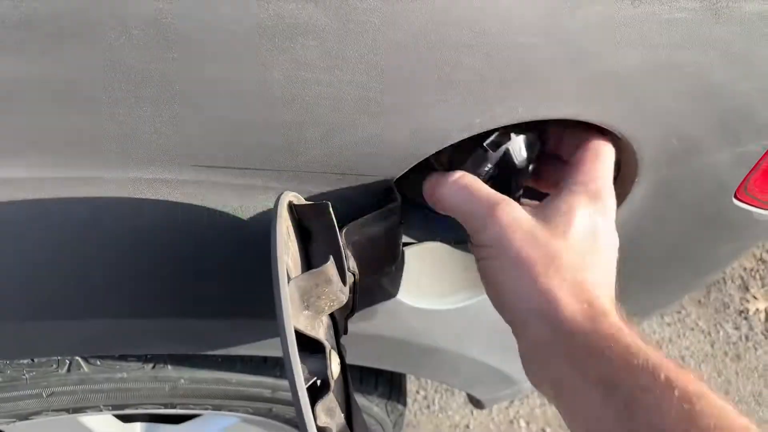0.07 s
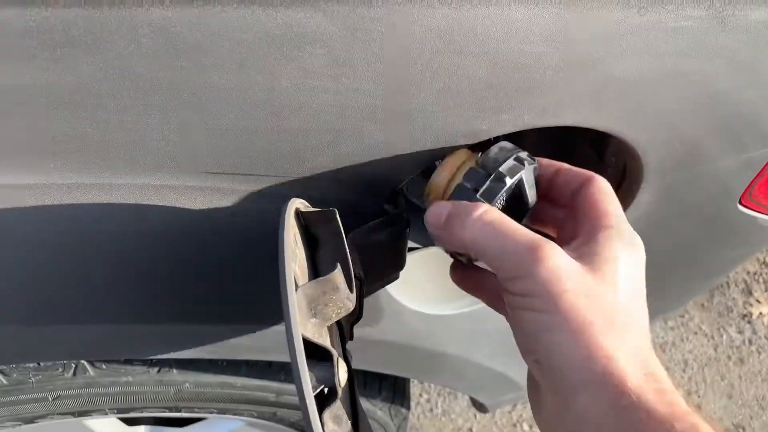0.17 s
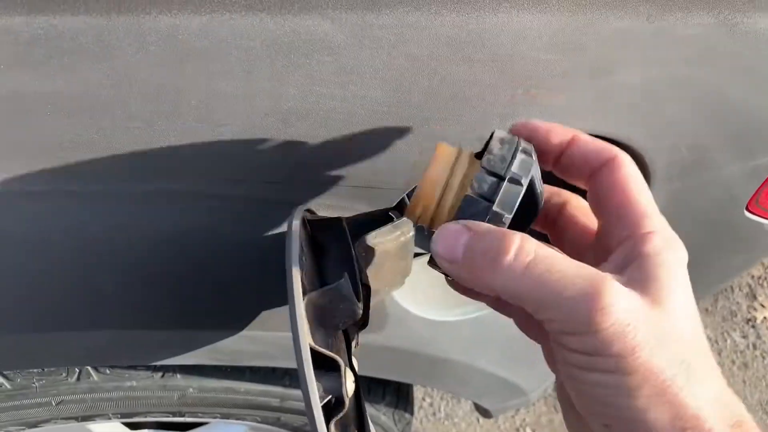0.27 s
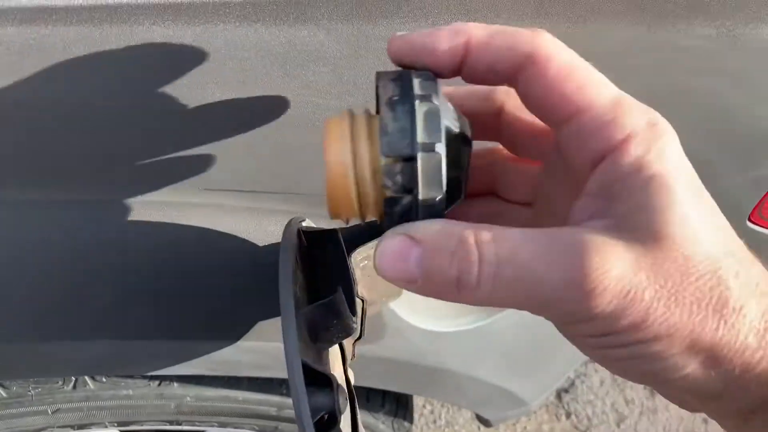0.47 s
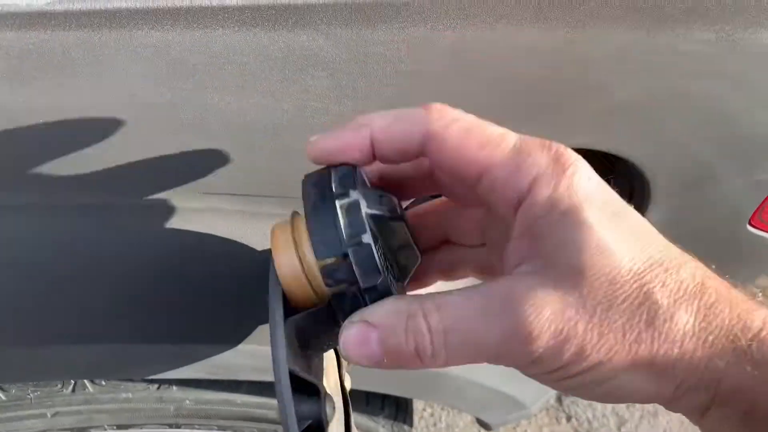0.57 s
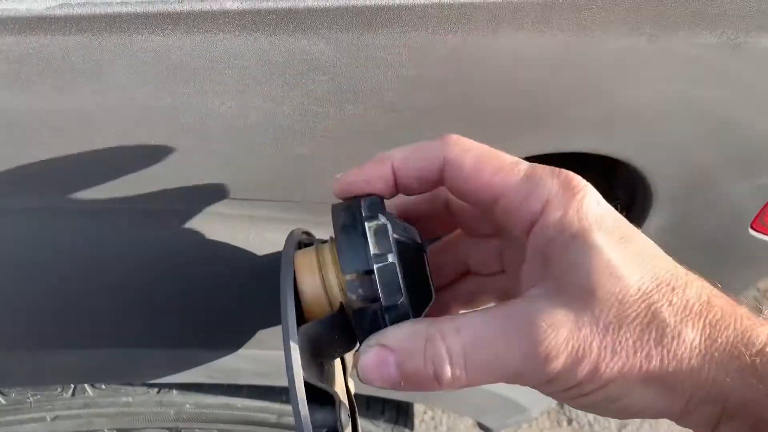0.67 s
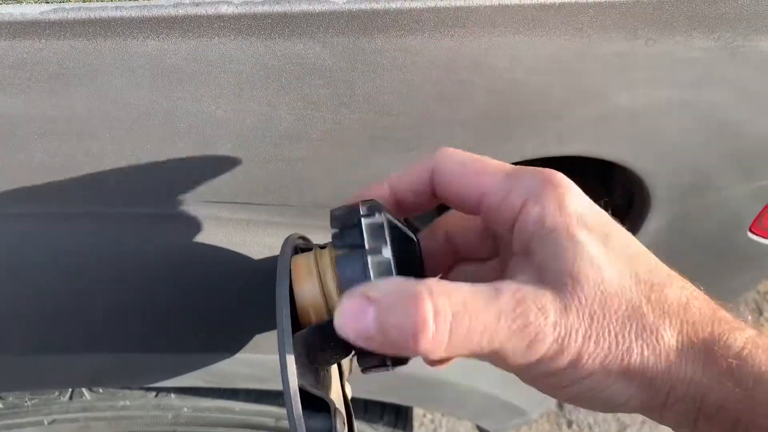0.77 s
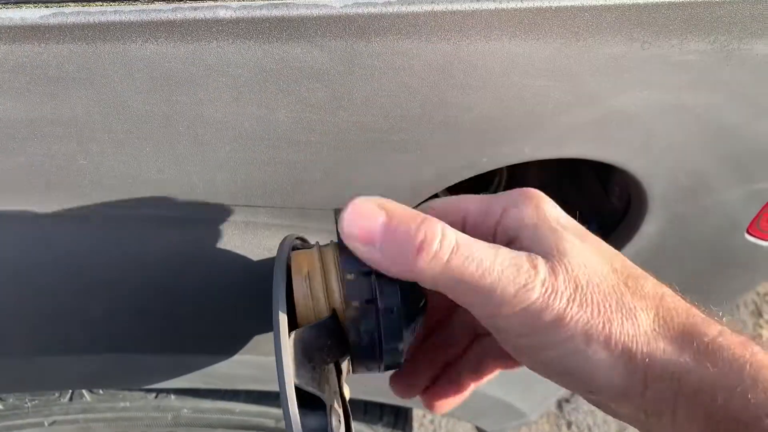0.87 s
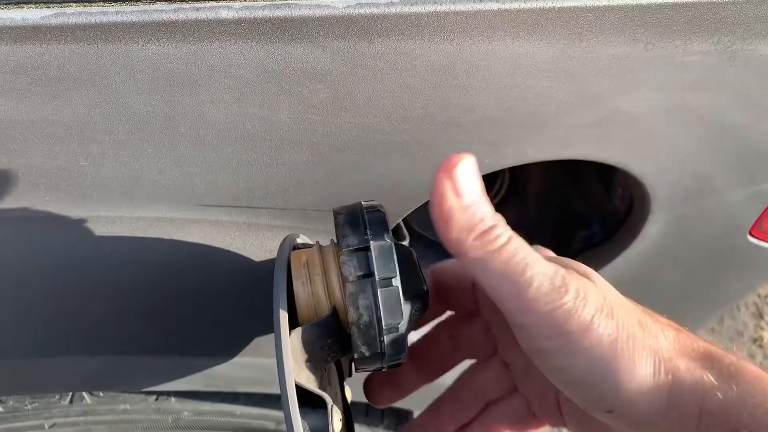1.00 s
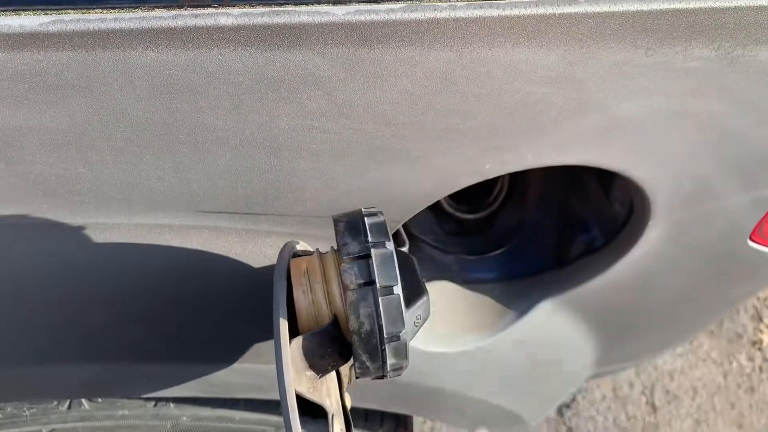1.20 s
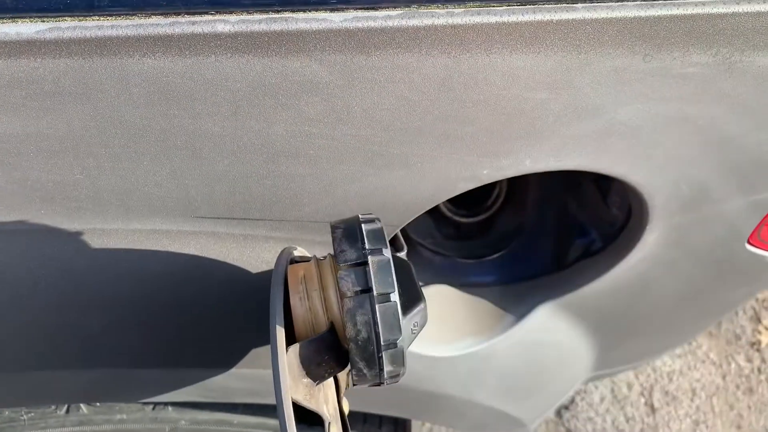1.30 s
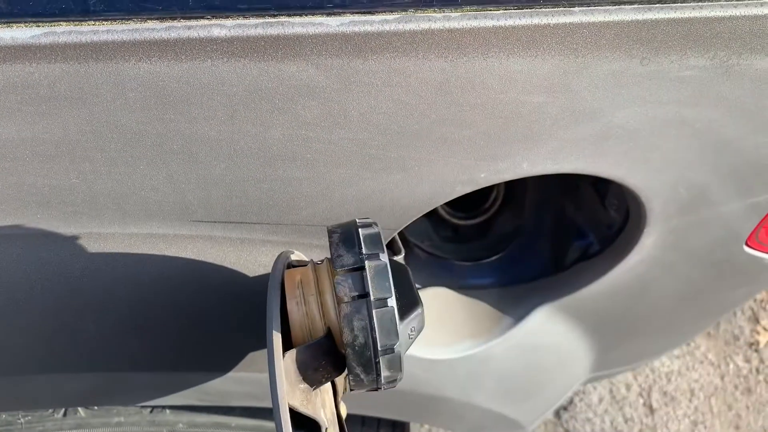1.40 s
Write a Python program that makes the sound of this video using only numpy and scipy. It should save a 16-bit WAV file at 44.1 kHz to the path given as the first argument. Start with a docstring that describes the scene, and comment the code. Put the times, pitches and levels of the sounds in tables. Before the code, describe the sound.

A plastic fuel cap comes out of the filler neck with a hollow clunk at about 0.1 seconds, followed by tiny ticks. At 0.5 seconds it knocks onto the fuel door and rocks briefly. Around 0.75 seconds it rubs and bumps into place, with light finger scuffs and soft booms from the car panel until about 1 second. Distant traffic rumbles and hisses faintly throughout.

```python
"""A plastic fuel cap comes out of the filler neck with a hollow clunk, then is knocked onto the open fuel door
and settles. Each clunk is a quick run of contacts: a crack and ringing plastic, whose low notes spread more
slowly through the struck part and thump a moment later. Fingers scuff the cap, which ticks and drags as it is
handled. Distant traffic rumbles and hisses off to the right the whole time."""
import sys
import numpy as np
from scipy import signal
from scipy.fft import rfft, irfft
from scipy.io import wavfile

SR = 44100
rng = np.random.default_rng(int(sys.argv[2]) if len(sys.argv) > 2 else 0)


def dump_mix(stems):
    """Bounce the given channels to the path in sys.argv[1] as a 16-bit WAV at rate SR."""
    frames = np.atleast_2d(stems).T  # one column per channel
    limited = np.clip(frames, -1, 1)  # hard clip at full scale
    pcm = np.round(limited * 32767).astype(np.int16)
    wavfile.write(sys.argv[1], SR, pcm)


N = 63945
T = np.arange(N) / SR
FREQS = np.maximum(np.arange(N // 2 + 1) * SR / N, 1)
LEFT_RIGHT = np.array([[1], [-1]])


def from_db(db):
    """Turn decibels into a number to multiply by."""
    return 10 ** (np.asarray(db) / 20)


def unit_power(x):
    """Scale a sound to an average power of 1."""
    return x / np.sqrt(np.mean(x ** 2) + 1e-20)


def at_hz(rows, hz, column=1):
    """Look up a pitch in a table, sliding between its rows."""
    table = np.array(rows)
    return np.interp(np.log(hz), np.log(table[:, 0]), table[:, column])


def sides(pan_db):
    """Gains that make the left side pan_db louder than the right."""
    return from_db(LEFT_RIGHT * pan_db / 2)


# Where the cap is heard. Each row: pitch in Hz, left minus right level in dB.
CAP_PAN = [(150, -0.5), (450, 1.7), (900, 7.5), (2000, 5), (4000, -1.5), (12000, -0.5)]
# Each row: pitch in Hz, how alike the two sides are (1 is fully alike).
CAP_LIKENESS = [(150, .97), (400, .9), (1000, .6), (2000, .4), (5000, .55), (12000, .8)]
# Each row: pitch in Hz, delay of the left side in milliseconds.
CAP_LAG = [(900, 0), (1600, 0.294)]
def noise(colour, likeness=CAP_LIKENESS, lag=CAP_LAG, pan=CAP_PAN, tilt_db=0):
    """Stereo noise with a given tone colour, placed at the cap unless told otherwise."""
    mid, side = rfft(rng.standard_normal((2, N)))
    alike = at_hz(likeness, FREQS)
    both = np.sqrt(1 + alike) * mid + np.sqrt(1 - alike) * side * LEFT_RIGHT
    both *= sides(at_hz(pan, FREQS))
    both[0] *= np.exp(-2j * np.pi * FREQS * at_hz(lag, FREQS) / 1000)
    tone = from_db(at_hz(colour, FREQS) + tilt_db * np.log2(FREQS))
    return unit_power(irfft(both * tone, N))


# The street's tone. Each row: pitch in Hz, relative level in dB.
TRAFFIC_COLOUR = [(25, -28), (40, -22), (55, -1.5), (75, 0.0), (105, 1), (150, -1), (200, -2.5), (300, -11),
                  (400, -13), (600, -15.5), (900, -14), (1400, -12.5), (1700, -9), (2100, -11),
                  (2550, -20.5), (3050, -30.5), (4400, -26.5), (5600, -41.5), (8000, -44), (10000, -55.5),
                  (15000, -88)]
# Each row: time in seconds, level in dB.
TRAFFIC_LEVEL = [(0, -39.5), (0.35, -37), (0.8, -35), (1.44, -36.5)]
# Each row: pitch in Hz, how alike the two sides are.
TRAFFIC_LIKENESS = [(100, 1), (300, 0.88), (800, 0.65), (2000, .75), (5000, 0.2), (12000, 0.13)]
# Each row: pitch in Hz, delay of the left side in milliseconds.
TRAFFIC_LAG = [(200, 0.72), (1500, 0.41)]
# Each row: pitch in Hz, left minus right level in dB.
TRAFFIC_PAN = [(100, .4), (700, 0.5), (2000, 2.5), (5000, -2), (12000, -4.5)]
# Engine notes. Each row: pitch in Hz, level in dB at 1 second, change in dB per second.
ENGINE_NOTES = [(81.5, -48, -4), (174.6, -47, 5.5), (317.9, -49.5, 8), (398.8, -63, -6)]
def traffic(note_width_hz=3.8):
    """Far rumble and tyre hiss; narrow bands of noise make a wavering engine drone."""
    level = from_db(np.interp(T, *np.transpose(TRAFFIC_LEVEL)))
    street = level * noise(TRAFFIC_COLOUR, TRAFFIC_LIKENESS, TRAFFIC_LAG, TRAFFIC_PAN)
    white = rfft(rng.standard_normal(N))
    for hz, db, growth in ENGINE_NOTES:
        note = irfft(white / (1 + ((FREQS - hz) / note_width_hz) ** 2), N)
        street += from_db(db + growth * (T - 1)) * unit_power(note)
    return street


def swells(rows):
    """Pressure that rises and falls smoothly, once for each row."""
    return sum(from_db(db) * np.exp(-.5 * ((T - middle) / half) ** 2) for middle, half, db in rows)


# Finger slides. Each row: middle in seconds, half length in seconds, level in dB.
SCUFFS = [(0.02, 0.0083, -46), (0.562, 0.0095, -41), (0.6, 0.082, -65.5), (0.755, 0.056, -55.5),
          (0.85, 0.033, -63), (0.945, 0.011, -59.5), (1.298, 0.012, -56.5), (1.395, 0.03, -57.5)]
# Each row: pitch in Hz, relative level in dB.
SCUFF_COLOUR = [(1000, 5.5), (3000, 0.5), (5000, 0.5), (7500, 2.5), (10300, 2), (13500, -6.5), (15500, -1)]
def finger_scuffs():
    """Fingers slide over the cap with a faint hiss."""
    return swells(SCUFFS) * noise(SCUFF_COLOUR)


def blow(start, rise, fade):
    """Loudness of one contact: it rises fast, then drops 60 dB in `fade` seconds."""
    age = np.maximum(T - start, 0)
    return (1 - np.exp(-age / rise)) * from_db(-60 * np.minimum(age / fade, 4))


def travel(hz, delay_s=0.00202, instant_hz=6075, longest_s=0.00671):
    """Seconds a bending wave takes to spread over the part: low notes arrive later."""
    return np.clip(delay_s * (np.sqrt(instant_hz / hz) - 1), 0, longest_s)


THUMP_HZ, RING_LOW_HZ, RING_HIGH_HZ, CRACK_HZ = 420, 736, 2380, 3520
def strength(hz, thump, ring, crack):
    """How hard a contact drives a pitch: thump sets the lows, ring the middle, crack the highs."""
    levels = [(THUMP_HZ, thump), (RING_LOW_HZ, ring), (RING_HIGH_HZ, ring), (CRACK_HZ, crack)]
    return from_db(at_hz(levels, hz))


SKEW_RAD, SKEW_FULL_HZ = 1.67, 1300   # the two sides swing out of step, most from this pitch up
def ringing(hits, notes, rise_cycles=0.68):
    """Every contact sets the part's own notes swinging; low ones build up more slowly."""
    out = np.zeros((2, N))
    for k, (hz, db, fade) in enumerate(notes):
        sign = (-1) ** k
        skew = sign * SKEW_RAD * min(hz / SKEW_FULL_HZ, 1) * LEFT_RIGHT / 2
        gain = sign * from_db(db) * sides(at_hz(CAP_PAN, hz))
        for start, *levels in hits:
            arrival = start + travel(hz)
            swing = np.sin(2 * np.pi * hz * (T - arrival) + skew)
            out += gain * strength(hz, *levels) * blow(arrival, rise_cycles / hz, fade) * swing
    return out


def clatter(hits, bands, bite_s=0.0014, rise_cycles=0.81):
    """Notes too crowded to tell apart: contacts kick bands of noise that each fade at their own rate."""
    flat = noise([(100, 0), (10000, 0)])
    spectrum = rfft(flat) * from_db(at_hz(bands, FREQS))
    centres = np.geomspace(200, 15000, 16)
    out = np.zeros((2, N))
    for hz in centres:
        share = np.interp(np.log(FREQS), np.log(centres), centres == hz) * (FREQS > centres[0] / 2)
        band = irfft(spectrum * share, N)
        rise, fade = bite_s + rise_cycles / hz, at_hz(bands, hz, column=2)
        for start, *levels in hits:
            out += band * strength(hz, *levels) * blow(start + travel(hz), rise, fade)
    return out


# Bumps of the thread. Each row: start in seconds, then thump, ring and crack strength in dB.
NECK_HITS = [(0.0945, -29, -26, -39.5), (0.096, -17, -18, -59), (0.1035, -12.5, -40, -38.5),
             (0.108, -18, -18.5, -46), (0.1125, -21.5, -30, -38), (0.1215, -23, -18.5, -57),
             (0.1275, -43, -50, -41), (0.143, -24.5, -51, -76)]
# Clear notes of neck and cap. Each row: pitch in Hz, relative level in dB, fade time in seconds.
NECK_NOTES = [(80.5, -10, 0.044), (133, -0.5, 0.053), (195, 5, 0.068), (273, -17, 0.14), (397, -6, 0.078),
              (477.7, -3.5, 0.13), (802, -16.5, 0.12), (1283, -10.5, 0.23), (1364, -4.5, 0.049),
              (2310, -16, 0.044), (2534, -6.5, 0.047), (3890, -4, .06), (4310, -2, 0.051),
              (5130, -14.5, 0.14), (6476, -11, 0.051), (7560, -5.5, 0.045)]
# Their crowded notes. Each row: pitch in Hz, relative level in dB, fade time in seconds.
NECK_CLATTER = [(197, 9.5, 0.073), (474, -2.5, 0.04), (694, -7, 0.037), (1270, 1.5, 0.041),
                (1790, -7, 0.024), (3340, -5.5, .05), (4260, 6, 0.03), (8900, -3, 0.036),
                (14100, -3.5, 0.033)]
def neck_clunk(clatter_db=10):
    """The cap's thread bumps out of the filler neck, and both ring."""
    return ringing(NECK_HITS, NECK_NOTES) + from_db(clatter_db) * clatter(NECK_HITS, NECK_CLATTER)


# Each row: start in seconds, level in dB, added brightness in dB per octave.
TICKS = [(0.1679, -38, -1), (0.184, -40, 2), (0.197, -39, -4.5), (0.205, -46, 0), (0.904, -49.5, 5)]
# Each row: pitch in Hz, relative level in dB.
TICK_COLOUR = [(1000, -17), (3000, -10), (5000, 10), (8500, -7), (13500, -5), (16000, -17)]
def plastic_ticks(rise_s=0.00033, fade_s=0.054):
    """Light touches on the plastic make tiny, bright bursts of noise."""
    return sum(from_db(db) * blow(start, rise_s, fade_s) * noise(TICK_COLOUR, tilt_db=bright)
               for start, db, bright in TICKS)


# Knocks on the door. Each row: start in seconds, then thump, ring and crack strength in dB.
DOOR_HITS = [(0.4852, -24.5, -19.5, -26), (0.4905, -22, -21.5, -39), (0.501, -18.5, -23, -37.5),
             (0.508, -26.5, -25.5, -41), (0.525, -30.5, -24.5, -47), (0.54, -25.5, -53, -49),
             (0.5665, -25.5, -22, -47.5), (0.5725, -27.5, -34.5, -70), (0.606, -30, -42, -60),
             (0.748, -36.5, -35.5, -52), (0.915, -46.5, -60, -74)]
# Clear notes of door, cap and panel. Each row: pitch in Hz, relative level in dB, fade time in seconds.
DOOR_NOTES = [(74, -3.5, 0.22), (144.1, 1.5, 0.3), (148.4, -32, 2.7), (218.8, 1.5, 0.23),
              (281.2, -7.5, 0.14), (381, -17, 0.11), (454, -13.5, 0.113), (596.6, -8.5, 0.082),
              (621, -6.5, 0.096), (828, -13.5, 0.12), (890, -15, .08), (1126, -23, 0.13),
              (1295, -5.5, 0.069), (1383, -3, 0.053), (1613, -5, 0.038), (1864, -12.5, 0.11),
              (1934, -5.5, .08), (2229, -12.5, 0.092), (3250, -12, 0.12), (4087, -6.5, 0.085),
              (5170, -0.5, 0.049), (5370, 1.5, 0.038)]
# Their crowded notes. Each row: pitch in Hz, relative level in dB, fade time in seconds.
DOOR_CLATTER = [(207, 18, 0.06), (496, 0, 0.021), (800, 5.5, 0.035), (1390, -6, 0.087), (2100, 1.5, 0.02),
                (3300, -8, 0.074), (4000, 3, 0.067), (5500, 1, 0.027), (8050, -14.5, 0.083),
                (14000, -17.5, 0.1)]
def door_clunk(clatter_db=9.5):
    """The cap lands on the fuel door, rocks, settles and is let go, shaking the car's panel."""
    return ringing(DOOR_HITS, DOOR_NOTES) + from_db(clatter_db) * clatter(DOOR_HITS, DOOR_CLATTER)


# Each row: middle in seconds, half length in seconds, level in dB.
DRAGS = [(0.735, 0.028, -40.5), (0.757, 0.011, -42)]
# Each row: pitch in Hz, relative level in dB.
DRAG_COLOUR = [(200, -17), (380, 1.5), (700, -18), (1400, -4), (1900, -14.5), (6000, -33.5), (15000, -34.5)]
def cap_drags():
    """The cap rubs on the door as it is pressed into place."""
    return swells(DRAGS) * noise(DRAG_COLOUR)


# Each row: middle in seconds, half length in seconds, level in dB.
BOOMS = [(0.765, 0.014, -35), (0.94, 0.025, -37.5), (1.0, 0.032, -40.5)]
# Each row: pitch in Hz, relative level in dB.
BOOM_COLOUR = [(40, -54), (85, 1), (145, 7.5), (215, 8), (330, -39), (900, -61)]
def panel_booms():
    """The car's panel booms softly under the hand."""
    return swells(BOOMS) * noise(BOOM_COLOUR)


def scene():
    """With the street behind, the cap comes off and goes onto the door."""
    cap_off = finger_scuffs() + neck_clunk() + plastic_ticks()
    return traffic() + cap_off + door_clunk() + cap_drags() + panel_booms()


def record(dry, cutoff_hz=16150):
    """Cut away the very highest treble with a steep filter."""
    return signal.sosfilt(signal.cheby2(24, 70, cutoff_hz, fs=SR, output="sos"), dry)


dry = scene()
out = record(dry)
dump_mix(out)
```